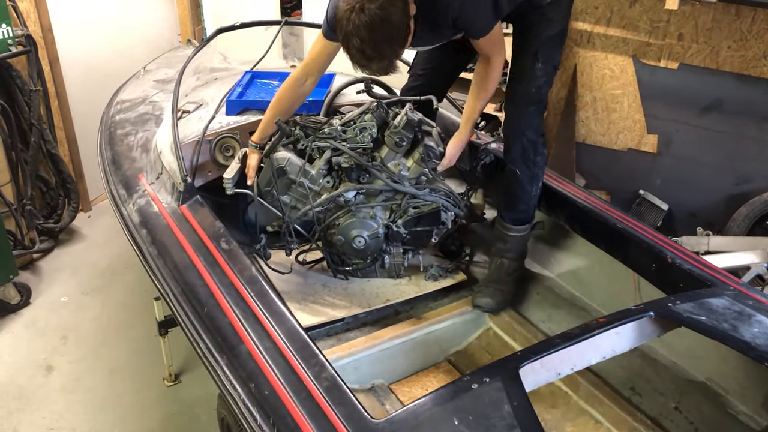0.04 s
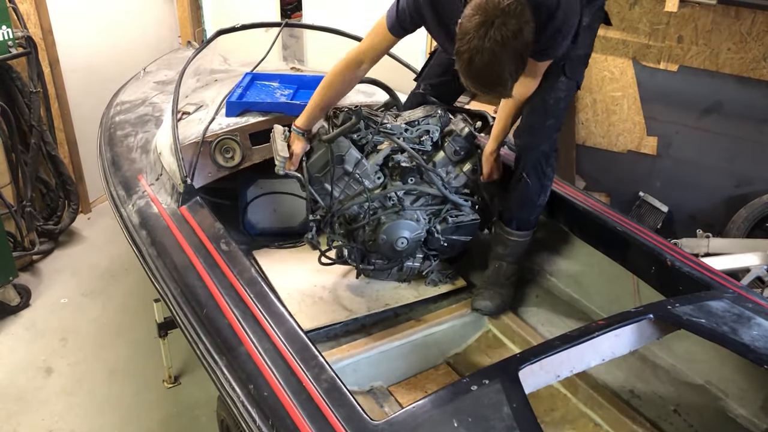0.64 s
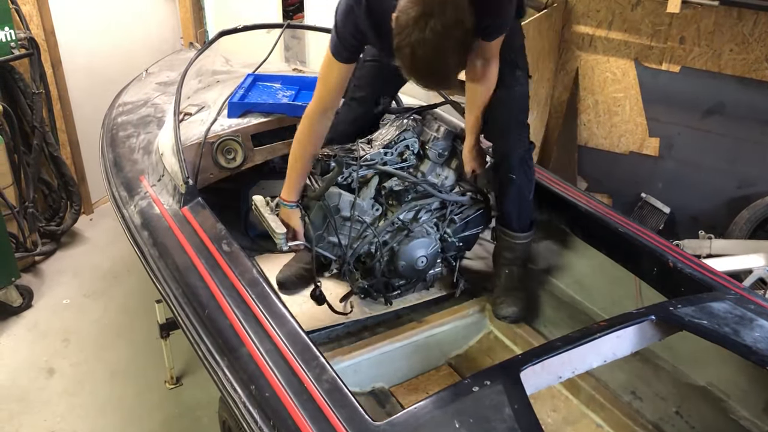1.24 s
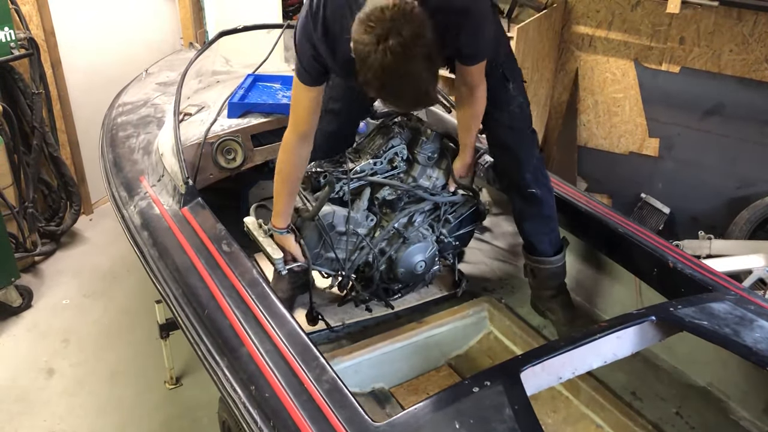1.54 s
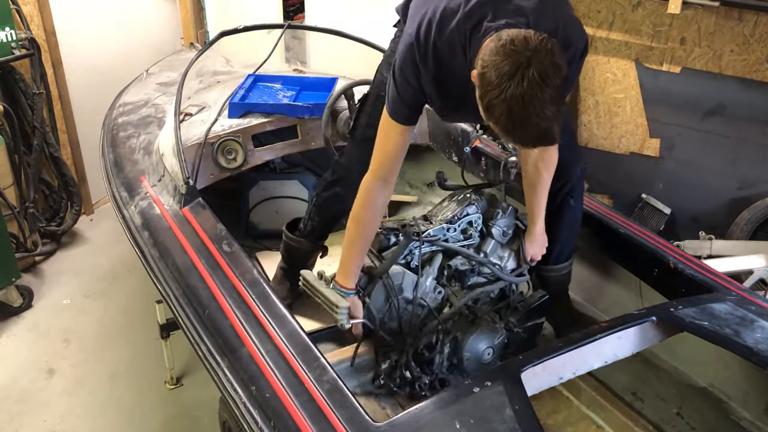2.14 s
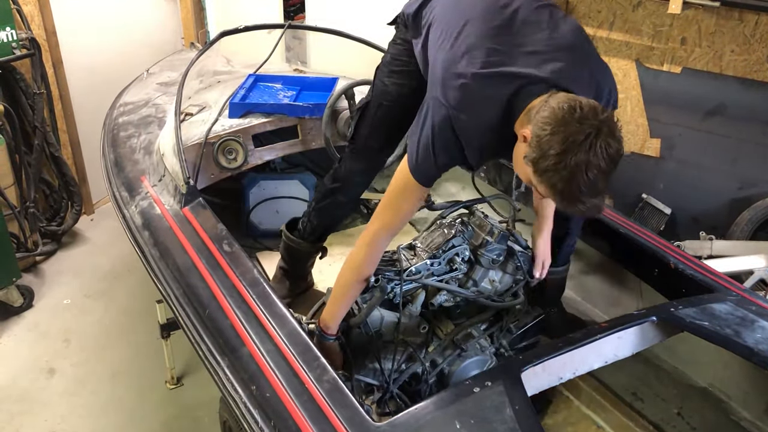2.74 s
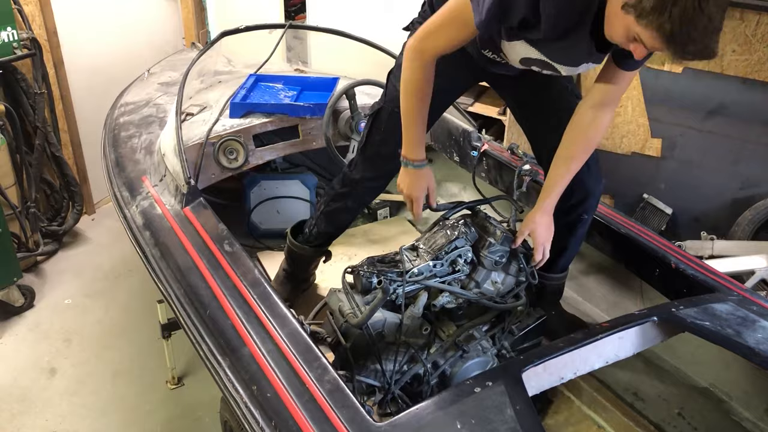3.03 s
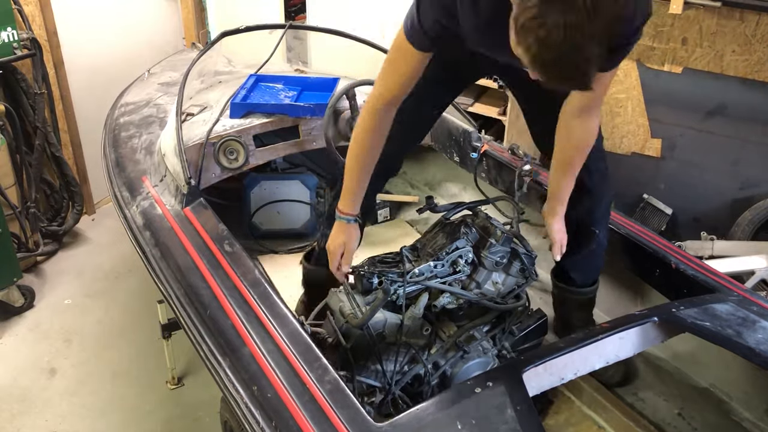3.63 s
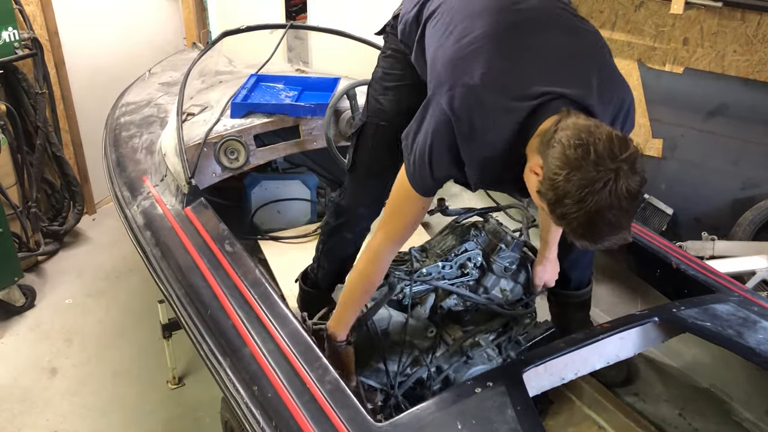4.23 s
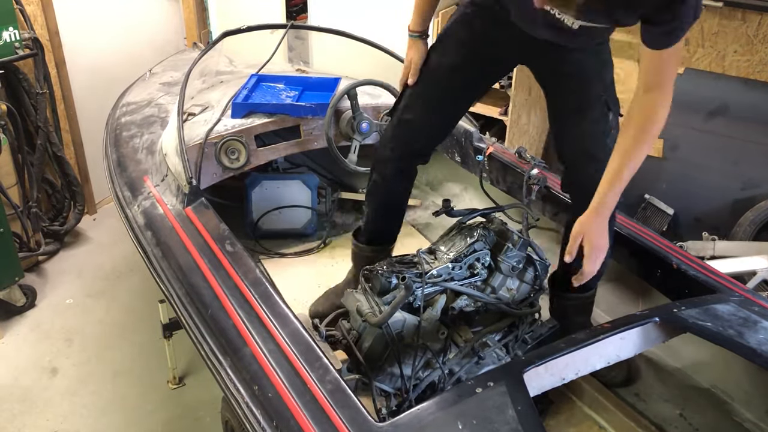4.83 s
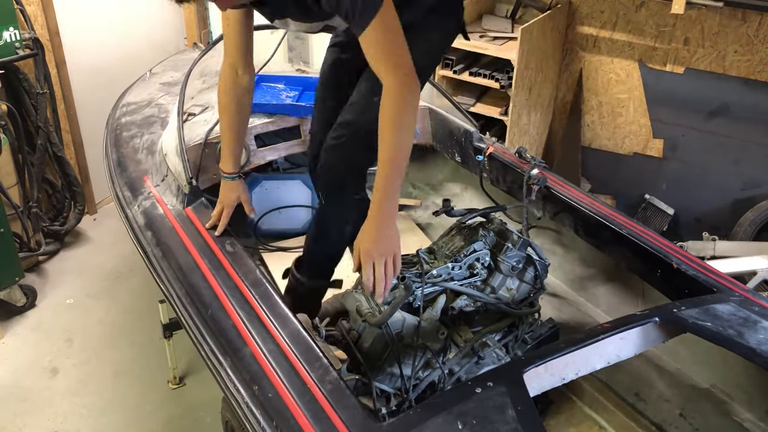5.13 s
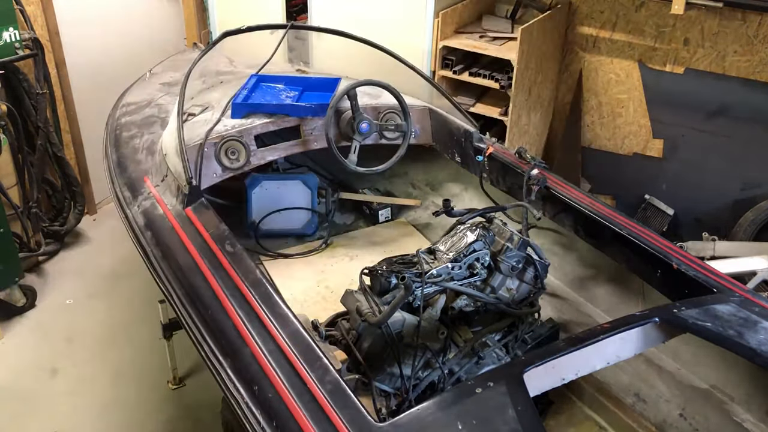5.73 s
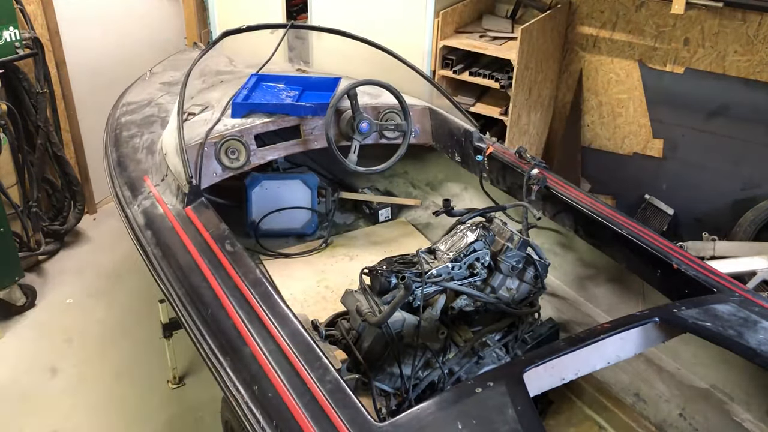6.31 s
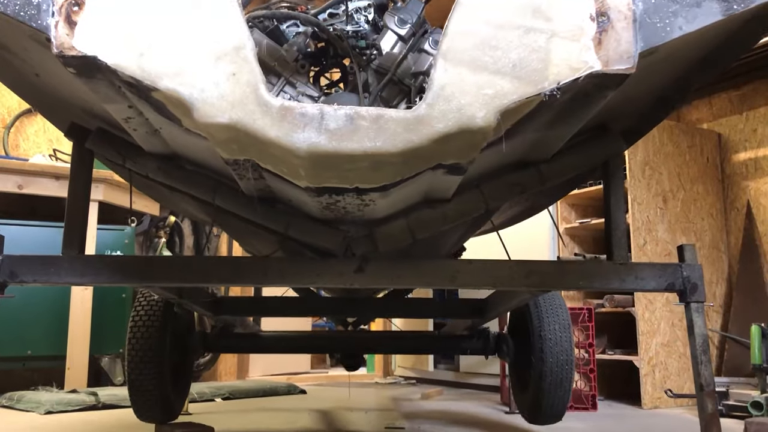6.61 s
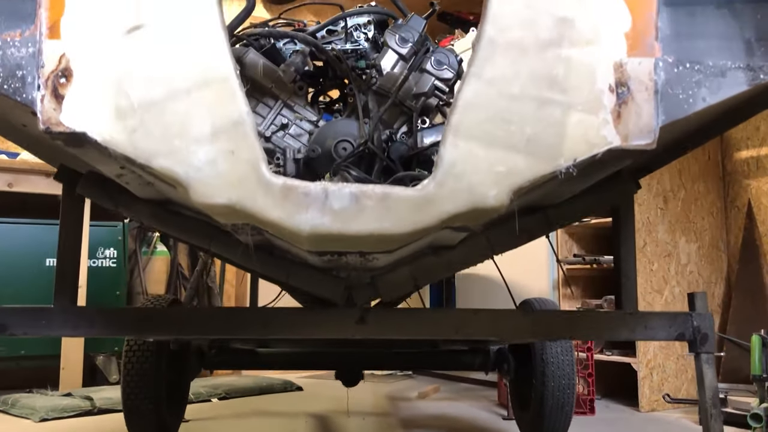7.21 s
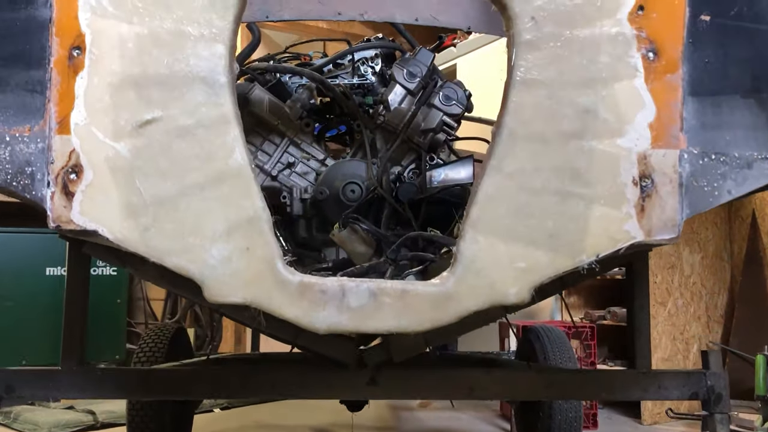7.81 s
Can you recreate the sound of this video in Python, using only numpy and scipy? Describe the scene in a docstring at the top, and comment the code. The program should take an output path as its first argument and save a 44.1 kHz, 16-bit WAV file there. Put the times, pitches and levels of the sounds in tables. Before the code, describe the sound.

Hollow knocks and jerky scraping as an engine is shifted inside a fibreglass boat, followed by boot steps and faint room hum.

```python
"""Hollow clunks in a small, dry workshop: a heavy engine is heaved into an open fibreglass boat hull,
lands hard and is dragged into place in jerks. Hoses and fittings click, clothes rustle, and boots scuff
and step on the boards and over the side. Blows and slides scatter in the hull's hollow and ring its
panels and the engine casing. Near the end the sound cuts to the low hum of the empty workshop."""
import sys
import numpy as np
from scipy import signal
from scipy.fft import rfft, irfft, next_fast_len
from scipy.io import wavfile
from scipy.ndimage import uniform_filter1d, map_coordinates

SR = 44100
rng = np.random.default_rng(int(sys.argv[2]) if len(sys.argv) > 2 else 0)


def materialize(psi):
    """Save the field psi as 16-bit PCM at rate SR to the path in sys.argv[1].

    A 1-D psi becomes a single channel; in a 2-D psi each row is a channel.
    """
    bounded = np.clip(np.atleast_2d(psi).T, -1, 1)
    quanta = np.round(bounded * 32767).astype(np.int16)
    wavfile.write(sys.argv[1], SR, quanta)


N = 355432
TIME = np.arange(N) / SR
LANDING_S = 2.042  # the engine's full weight comes down

# Clicks of hoses, fittings and grit. Each row: start in seconds, relative level in dB,
# hardness (extra treble) in dB, note of the part in Hz.
FITTING_CLICKS = [(0.414, -45, 5, 396), (0.485, -45.5, -3.5, 1560), (0.615, -44.5, 10, 2480),
                  (0.828, -39, -3.5, 704), (0.854, -36, -0.5, 1760), (1.051, -50.5, -2, 1500),
                  (1.127, -32, 3, 3030), (1.28, -33, 9, 1480), (1.424, -31.5, 15, 5494),
                  (2.354, -32.5, -1, 875), (3.299, -51, -6, 1260), (3.395, -44.5, -3, 830),
                  (3.686, -36, 2, 4900), (3.725, -26.5, -3.5, 543), (3.822, -51, -7.5, 810),
                  (4.723, -43.5, -5, 456), (4.776, -40.5, -4, 774), (4.924, -26.5, -3, 940),
                  (5.128, -55, 11, 5400), (5.286, -53.5, -9, 4550), (5.512, -33.5, 8, 625),
                  (5.635, -32.5, 3, 3460), (5.864, -59, 3.5, 2600), (5.967, -54.5, 9, 4430)]
# Tone colour of a small part's click. Each row: frequency in Hz, level in dB.
CLICK_COLOUR = [(100, -36.5), (200, -18.5), (400, -0.5), (900, 0), (1700, -1), (3000, -2.5), (5000, 0.5),
                (7000, -3.5), (11000, -4.5), (16000, -13.5)]
# Short slides of boots, clothes and engine. Each row: start and length in seconds,
# relative level in dB, hardness in dB, note of the rubbed spot in Hz.
SHORT_SLIDES = [(0.3, 0.091, -50.5, 4.5, 1520), (0.633, .04, -47.5, 3, 1560),
                (0.693, .02, -40.5, 1.5, 1050), (0.859, .034, -36.5, 9.5, 1750),
                (0.914, .053, -51, -5, 384), (1.143, 0.048, -37, 5, 1540), (1.193, .05, -43, -6.5, 360),
                (1.256, 0.074, -36, -4.5, 1540), (1.466, .017, -37, -4.5, 370.2),
                (1.892, 0.033, -31.5, 2.5, 4700), (1.915, 0.06, -25.5, 1.5, 2800),
                (2.302, .044, -46, -4, 1380), (2.526, 0.026, -46, -5.5, 1920),
                (2.609, 0.074, -37, -5.5, 1036), (3.138, 0.032, -38.5, -0.5, 630),
                (3.19, .049, -33, -2.5, 700), (3.69, 0.0598, -30.5, -1.5, 526),
                (3.767, .034, -43, -9.5, 560), (4.839, .07, -33.5, -4, 1100),
                (4.917, 0.043, -32.5, -3.5, 920), (5.344, 0.035, -46, -9, 679),
                (5.497, 0.039, -29, -3.5, 648), (5.545, 0.077, -44, -11, 827),
                (6.102, .032, -56.5, -3, 1205), (6.327, 0.1, -58.5, -4, 1128)]
# Jerks of the dragged engine. Each row: start in seconds, then in dB the catch's relative level,
# its weight (extra bass), its hardness, and the peak level of the slide that follows.
DRAG_JERKS = [(3.93, -38.5, 2, -4.5, -44), (3.969, -45, 14, -2, -60), (4.01, -37, 18, -9.5, -36),
              (4.037, -35, 4, 3, -42.5), (4.076, -29.5, -3.5, -1.5, -35), (4.176, -41, -7, -5.5, -52.5),
              (4.225, -34.5, -18, -0.5, -34.5), (4.317, -35.5, 3.5, -2.5, -41.5),
              (4.4, -39.5, -21, -6, -42.5), (4.464, -40.5, -17, -4, -39)]


def amp(db):
    """Decibels to gain."""
    return 10 ** (np.asarray(db) / 20)


def unit(x):
    """Scale to rms 1."""
    return x / np.sqrt(np.mean(x ** 2) + 1e-20)


def levelled(x, length_s, db):
    """Scale x so that its first length_s seconds have the given level."""
    return x * amp(db) / np.sqrt(np.mean(x[:round(length_s * SR)] ** 2) + 1e-20)


def along(points, hz):
    """Read a curve of (Hz, value) points on a log frequency axis."""
    freqs, values = np.transpose(points)
    return np.interp(np.log(hz + 1), np.log(freqs), values)


def wobble(rate, size=N):
    """A smooth random curve with rate knots a second."""
    knots = rng.standard_normal(int(size * rate / SR) + 4)
    return map_coordinates(knots, [np.arange(size) * rate / SR])


def filtered(x, gain):
    """Equalise x with a gain that is a function of frequency."""
    padded = next_fast_len(len(x) + SR // 4)
    return irfft(rfft(x, padded) * gain(np.fft.rfftfreq(padded, 1 / SR)), padded)[:len(x)]


def noise(colour):
    """Steady noise of rms 1 in the given colour."""
    return unit(filtered(rng.standard_normal(N), lambda hz: amp(along(colour, hz))))


def add(track, start_s, sound):
    """Mix a sound into the track."""
    start = max(round(start_s * SR), 0)
    part = sound[:max(N - start, 0)]
    track[start:start + len(part)] += part


def room_air():
    """A faint, steady bed of air behind the work."""
    # Each row: frequency in Hz, level in dB.
    air_colour = [(100, -41.5), (170, -7), (280, 5), (450, -11), (800, 8), (1600, -11), (2500, 9),
                  (3300, -22), (5000, -19.5), (7000, -22), (16000, -22)]
    return amp(-70) * noise(air_colour)


def empty_workshop():
    """Low room rumble and a wavering hum that swells once."""
    # Each row: frequency in Hz, level in dB.
    rumble_colour = [(12, -52), (20, -14), (36, -10.5), (86, -4), (130, -16), (193, -14.5), (262, -17),
                     (434, -18.5), (718, -25), (1190, -30), (1660, -34), (3340, -38.5), (16000, -44)]
    hum_hz, swell_s, swell_width_s = 81, 7.58, 0.087
    phase = 2 * np.pi * np.cumsum(hum_hz + 2.23 * wobble(8.8)) / SR
    waver = amp(-73 - 1.5 * wobble(7))
    swell = amp(-59) * np.exp(-((TIME - swell_s) / swell_width_s) ** 2)
    hum = np.sqrt(2) * np.sin(phase) * (waver + swell)
    return hum + amp(-66) * noise(rumble_colour)


def workshop_reverb(sound):
    """The walls return a faint, dense tail in which each frequency dies at its own speed."""
    # Each row: frequency in Hz, seconds to fade by 60 dB.
    decay_times = [(200, .45), (1000, 0.26), (4000, 0.55), (14000, 0.87)]
    hz, t, bands = signal.stft(rng.standard_normal(SR // 2), SR, nperseg=128)
    fade = amp(-60 * t / along(decay_times, hz)[:, None])
    tail = signal.istft(bands * fade, SR, nperseg=128)[1]
    return amp(-25.5) * signal.fftconvolve(sound, tail / np.linalg.norm(tail))[:N]


def grit(size, rate, spread_db):
    """Friction as tiny slips of random strength, about rate a second, at rms 1."""
    slips = rng.random(size) < rate / SR
    return unit(slips * rng.standard_normal(size) * amp(spread_db * rng.standard_normal(size)))


def contact(chatter_s, chatter, size=2048):
    """The force of one impact, then a brief chatter as the surfaces seat."""
    age = np.arange(size) / SR / chatter_s
    force = grit(size, rate=1200, spread_db=4) * age * np.exp(-age * age)
    force *= chatter / (np.linalg.norm(force) + 1e-12)
    force[0] += 1
    return force


def scatter(force, direct, t60):
    """A contact arrives directly with a bright crack, then as dense reflections that die fast."""
    def smear(decay_s):
        fade = amp(-120 * np.arange(SR // 5) / SR / decay_s)
        energy = np.abs(signal.oaconvolve(force ** 2, fade / fade.sum()))
        return np.sqrt(energy) * rng.standard_normal(len(energy))
    reflections = smear(t60)
    crack = amp(-5.5) * np.diff(smear(decay_s=0.02172), prepend=0)
    out = reflections + crack
    out[:len(force)] += direct * force
    return out


def hull(force, colour, weight_db=0, hardness_db=0, note_hz=1000, note_db=0, ripple_db=0,
         ring=1, direct=0.35, t60=0.081, size=8192):
    """A force scatters in the hollow and rings the hull's modes and the note of the touched spot."""
    # Resonances of hull panels and engine casing. Each row: centre in Hz, width in Hz, lift in dB.
    modes = [(408, 40, 4), (510, 30, 5), (595, 50, -5), (832, 30, 6), (1122, 18, 6), (1258, 20, 5),
             (1320, 25, 5), (1449, 25, 4), (1566, 16, 5), (1798, 16, 4), (1948, 25, 4), (2892, 25, 5),
             (4415, 20, 6), (4980, 20, 5), (5260, 18, 6), (5485, 15, 7)]
    scattered = scatter(force, direct, t60)
    # even out the broad colour, so that scattering only spreads the sound in time
    blocks = len(scattered) // size + 1
    power = uniform_filter1d(np.abs(rfft(scattered, blocks * size)) ** 2, size=80 * blocks)[::blocks]
    hz = np.fft.rfftfreq(size, 1 / SR)
    db = along(colour, hz) - 10 * np.log10(np.abs(power) + 1e-12)
    db += ring * sum(lift / (1 + (2 * (hz - centre) / width) ** 2) for centre, width, lift in modes)
    db += note_db / (1 + ((hz / note_hz - 1) / 0.078) ** 2)
    # each spot favours and misses its own set of the many higher panel modes
    db += ripple_db * wobble(SR / 32, size=len(hz))
    db += weight_db * along([(420, 0.9), (700, 0.0083)], hz)
    # a soft contact cuts off above the panel notes; a hard one adds sparkle at the top
    db += min(hardness_db, 0) * along([(1450, 0.36), (2800, 1.5), (5000, 1.5), (12000, 2.3)], hz)
    db += max(hardness_db, 0) * along([(1500, 0.32), (4500, 0.14), (12000, 1.1)], hz)
    cepstrum = irfft(np.log(amp(db)))  # minimum phase: nothing sounds before the contact
    cepstrum[1:size // 2] *= 2
    cepstrum[size // 2 + 1:] = 0
    response = irfft(np.exp(rfft(cepstrum)))
    return signal.fftconvolve(scattered, response)


def body_effort():
    """How hard the body works, 0-1: it winds up before each click, jerk or slide and ebbs after it."""
    wind_up_s, follow_s = 0.03, 0.045
    t = np.arange(0, N / SR, 0.005)
    contacts = [row[:2] for row in FITTING_CLICKS + DRAG_JERKS]
    contacts += [(start + length / 2, db) for start, length, db, *_ in SHORT_SLIDES]
    moves = [amp(0.53 * db) * np.exp(-np.maximum((s - t) / wind_up_s, (t - s) / follow_s))
             for s, db in contacts]  # a louder contact takes a bigger move
    motion = np.linalg.norm(moves, axis=0)
    carrying = 0.26 * (t < LANDING_S)
    effort = np.hypot(motion / np.percentile(motion, 90), carrying)
    return np.interp(TIME, t, np.minimum(effort, 1))


def clothes_rustle(effort):
    """Cloth rubs in a soft, grainy rustle that follows the effort, over a faint constant fidget."""
    # Each row: frequency in Hz, level in dB.
    cloth_colour = [(110, -32.5), (180, -14), (300, -3), (800, -3), (1500, -5.5), (3000, -11), (5000, -16),
                    (8000, -16.5), (16000, -22)]
    working_db, fidget_db = -58, -66.5
    slips = grit(N, rate=1200, spread_db=3.5) * amp(2.5 * wobble(25))
    rustle = hull(slips, cloth_colour, weight_db=-0.5, hardness_db=0.5, ring=0.71, direct=0.55)[:N]
    return unit(rustle) * (amp(working_db) * effort + amp(fidget_db))


def hose_rattle(effort):
    """Loose hoses and cable ends tick at random, more often and harder with effort."""
    taps_per_s = 110 * effort
    taps = (rng.random(N) < taps_per_s / SR) * amp(2 * rng.standard_normal(N))
    ticking = hull(taps, CLICK_COLOUR, hardness_db=-6, ripple_db=3, ring=0.24, direct=0.3)[:N]
    return unit(ticking) * effort * amp(-57)


def footfall():
    """After the climb over the side, a boot heel lands on the workshop floor with a dull thud."""
    # Each row: frequency in Hz, level in dB.
    heel_colour = [(100, -49), (135, -61), (175, -5.5), (260, -7), (500, -8.5), (1000, -11), (3000, -18.5),
                   (16000, -48.5)]
    step = scatter(contact(chatter_s=0.011, chatter=7.5), direct=0.304, t60=0.12)
    thud = filtered(step, lambda hz: amp(along(heel_colour, hz)))
    out = np.zeros(N)
    add(out, start_s=6.234, sound=levelled(thud, length_s=0.037, db=-42))
    return out


def fitting_clicks():
    """Light parts tap the casing: short, bright contacts."""
    out = np.zeros(N)
    for start, db, hardness_db, note_hz in FITTING_CLICKS:
        force = contact(chatter_s=0.0028, chatter=0.92)
        tap = hull(force, CLICK_COLOUR, hardness_db=hardness_db, note_hz=note_hz,
                   note_db=12.5, ripple_db=5, ring=0.39, direct=0.29, t60=0.11)
        add(out, start, levelled(tap, length_s=0.013, db=db - 0.7))
    return out


def scuffs():
    """Boots, clothes and engine slide briefly: runs of small slips under an uneven pressure."""
    # Each row: frequency in Hz, level in dB.
    rub_colour = [(100, -41), (200, -11), (400, 2.5), (800, 6.5), (1600, 3), (3000, 1), (5000, 2),
                  (7000, -4), (11000, -5.5), (16000, -13)]
    build_up_s = 0.008
    out = np.zeros(N)
    for start, length, db, hardness_db, note_hz in SHORT_SLIDES:
        size = round(length * SR)
        pressure = signal.windows.tukey(size, 0.15) * amp(2 * wobble(90, size=size))
        pressure *= 1 - np.exp(-np.arange(size) / SR / build_up_s)
        slips = grit(size, rate=2000, spread_db=3.5)
        slide = hull(pressure * slips, rub_colour, hardness_db=hardness_db, note_hz=note_hz,
                     note_db=11.5, ripple_db=2.5, ring=0.72, direct=0.44)
        add(out, start, levelled(slide, length, db - 1.64))
    return out


def engine_drag():
    """The casing catches with a knock, scrapes along the hull floor and stalls, again and again."""
    # Each row: frequency in Hz, level in dB.
    scrape_colour = [(110, -46), (180, -22), (300, -10.5), (550, -8.5), (850, 7), (1400, -2), (2400, -4),
                     (4500, -17.5), (7000, -35.5), (16000, -42)]
    catch_hz, spread_octaves = 1020, 0.39
    slide_peak_s, coast_s, grind_db = 0.024, 0.051, -49
    catches, scrape_power = np.zeros(N), np.zeros(N)
    age = np.arange(SR // 2) / SR / slide_peak_s
    for start, catch_db, weight_db, hardness_db, slide_db in DRAG_JERKS:
        note_hz = catch_hz * 2 ** (spread_octaves * rng.standard_normal())
        add(catches, start, knock(catch_db, weight_db, hardness_db, note_hz))
        add(scrape_power, start, (amp(slide_db) * age * np.exp(1 - age)) ** 2)
    # the casing keeps grinding between jerks and coasts briefly after the last
    moving = (TIME > DRAG_JERKS[0][0]) & (TIME < DRAG_JERKS[-1][0] + coast_s)
    scrape_power += amp(grind_db) ** 2 * np.abs(uniform_filter1d(moving * 1.0, size=1000))
    slips = grit(N, rate=2400, spread_db=2.5) * amp(1.5 * wobble(45))
    scrape = hull(slips, scrape_colour, hardness_db=0.5, note_hz=805,
                  note_db=1.5, ripple_db=3.5, direct=0.76)[:N]
    return catches + unit(scrape) * np.sqrt(scrape_power)


def low_thump():
    """One brief, low thump as the loudest blow overloads the microphone."""
    age = np.arange(SR // 8) / SR / 0.005
    thump = age * np.exp(-age) * np.sin(2.2 * age)
    out = np.zeros(N)
    add(out, LANDING_S, amp(-28) * thump)
    return out


def knock(db, weight_db, hardness_db, note_hz):
    """One hollow blow on the hull; the louder it is, the longer it chatters."""
    # Each row: frequency in Hz, level in dB.
    blow_colour = [(100, -49), (165, -26.5), (260, -15), (400, -4.5), (750, 5), (1300, -3.5), (2000, -2.5),
                   (3200, -5), (5000, -6.5), (6500, -13.5), (10000, -20), (16000, -31)]
    medium_blow_db = -34.5
    force = contact(chatter_s=0.0038 * amp(0.62 * (db - medium_blow_db)), chatter=1.05)
    direct = 0.35 * amp(0.27 * abs(hardness_db))  # bare metal and flat soles both land compactly
    blow = hull(force, blow_colour, weight_db, hardness_db, note_hz,
                note_db=8.5, ripple_db=2.5, ring=0.78, direct=direct, t60=0.098)
    return levelled(blow, length_s=0.025, db=db - 0.3)


def hull_clunks():
    """Engine and boots strike the hull, loudest as the engine comes down."""
    # Each row: start in seconds, relative level in dB, weight (extra bass) in dB,
    # hardness (extra treble) in dB, note of the struck spot in Hz.
    blows = [(0.001, -41, 7, -12.5, 564), (0.07, -35, 1, -14, 725), (0.243, -53.5, -5, -18, 716),
             (1.103, -43.5, -7, -7, 745), (1.373, -37, -14, -8, 660), (1.52, -35.5, 1, -10, 1270),
             (1.573, -27, -5.5, -16, 750), (1.824, -43.5, -14, -11, 990), (1.985, -15.5, 2.5, -5.5, 1780),
             (2.01, -23, -4.5, 6, 5100), (2.041, -15, 2, 9.5, 4900), (2.067, -20.5, -8, -6.5, 2770),
             (2.084, -28.5, 0, -5, 4810), (2.142, -36.5, -7, -3.5, 1835), (2.161, -26.5, 5.5, -10.5, 460),
             (2.229, -35, 14.5, -10.5, 493), (2.251, -30, 14.5, -9.5, 580), (2.406, -38, 1, -9.5, 1010),
             (2.6, -32.5, -8.5, -7.5, 972), (2.686, -19, -9, -0.5, 1350), (2.691, -18, -14, 0.5, 1350),
             (2.741, -17, -13.5, -3.5, 473), (2.914, -48.5, -2.5, -2, 1010), (3.362, -36.5, -6, -4, 740),
             (3.451, -38, -24, -4, 672), (3.61, -18.5, -3, -16.5, 813), (3.621, -30, 6.5, -9, 884),
             (3.715, -19, -9, -10, 510), (4.645, -53, -15, -31, 810), (5.029, -46.5, 4, -29, 740),
             (5.064, -49.5, 22, 8, 390), (5.217, -28.5, 9, -8.5, 830), (5.456, -31, 14.5, -4.5, 342),
             (5.462, -30, 26, -14, 344), (5.634, -24.5, 6, 1, 1110), (5.764, -40, -11, -4.5, 1220),
             (6.222, -44, -26, 7, 3080)]
    out = np.zeros(N)
    for start, db, weight_db, hardness_db, note_hz in blows:
        add(out, start, knock(db, weight_db, hardness_db, note_hz))
    return out


def scene():
    """The handling in its room, then a quick cut to the empty workshop."""
    cut_s, crossfade_s = 6.4, 0.01
    effort = body_effort()
    handling = hull_clunks() + fitting_clicks() + scuffs() + engine_drag()
    handling += clothes_rustle(effort) + hose_rattle(effort) + footfall()
    busy = handling + low_thump() + workshop_reverb(handling) + room_air()
    after_cut = np.clip((TIME - cut_s) / crossfade_s + 0.5, 0, 1)
    return (busy * (1 - after_cut) + empty_workshop() * after_cut)[None]


def record(dry):
    """The microphone rounds the highest peaks and keeps nothing above its band limit."""
    ceiling, top_hz = 0.75, 16000
    rounded = dry[0] / (1 + np.abs(dry[0] / ceiling) ** 6) ** (1 / 6)
    return filtered(rounded, lambda hz: hz < top_hz)[None]


dry = scene()
out = record(dry)
materialize(out)
```